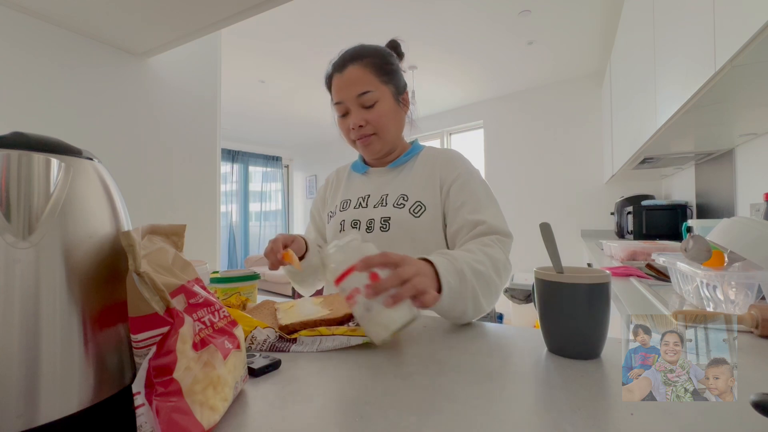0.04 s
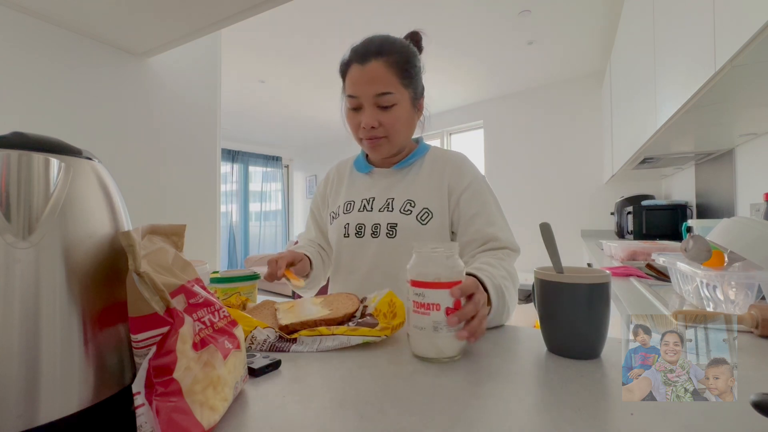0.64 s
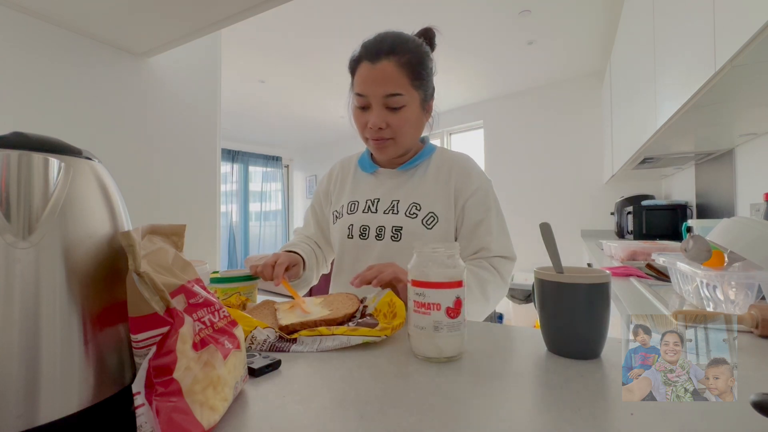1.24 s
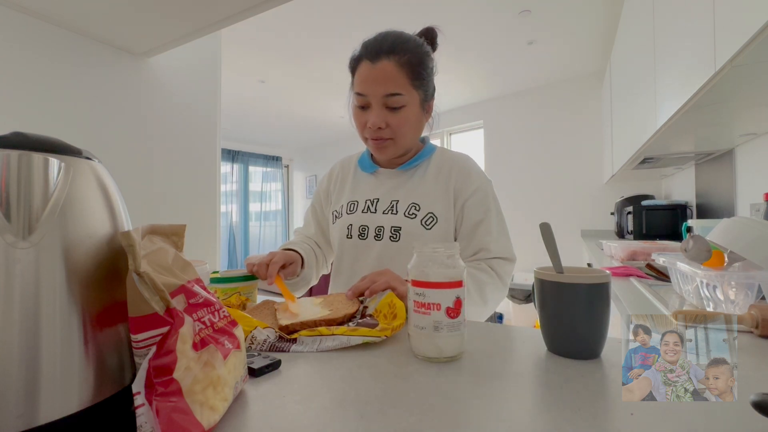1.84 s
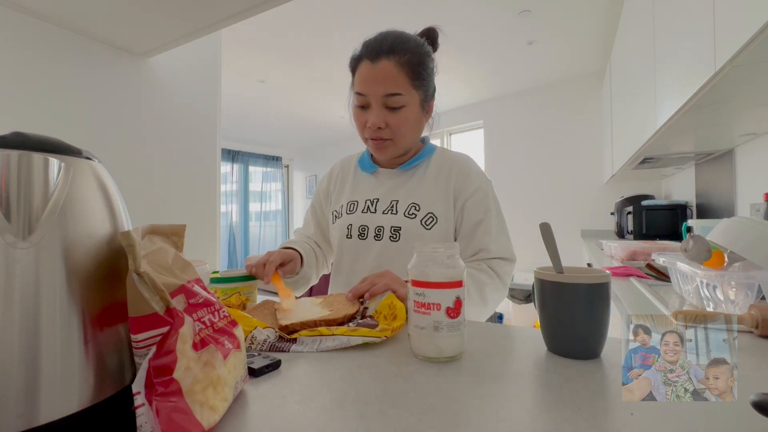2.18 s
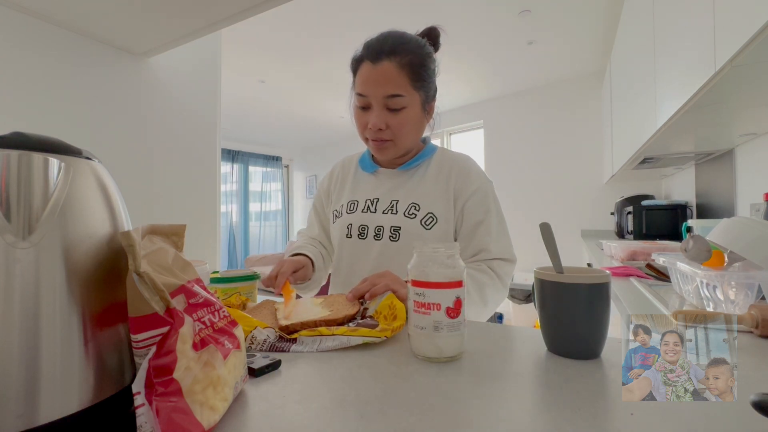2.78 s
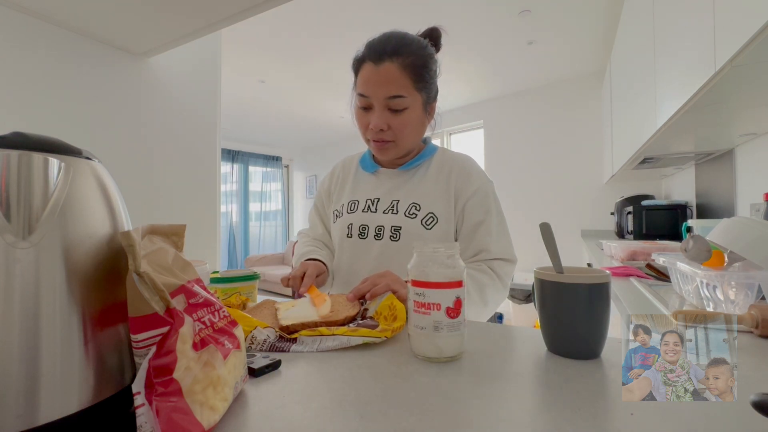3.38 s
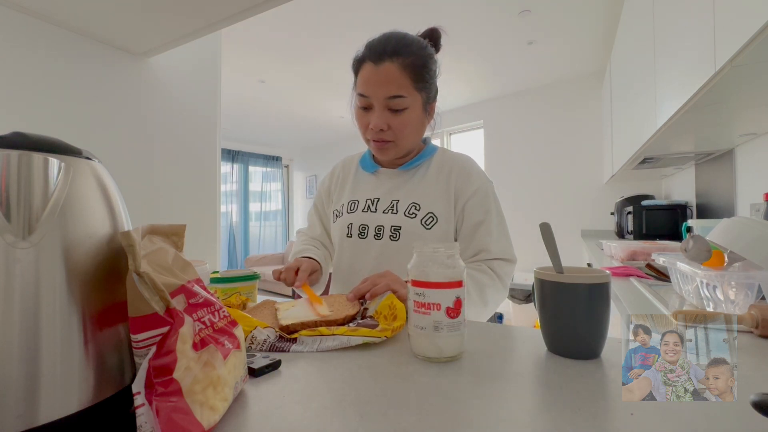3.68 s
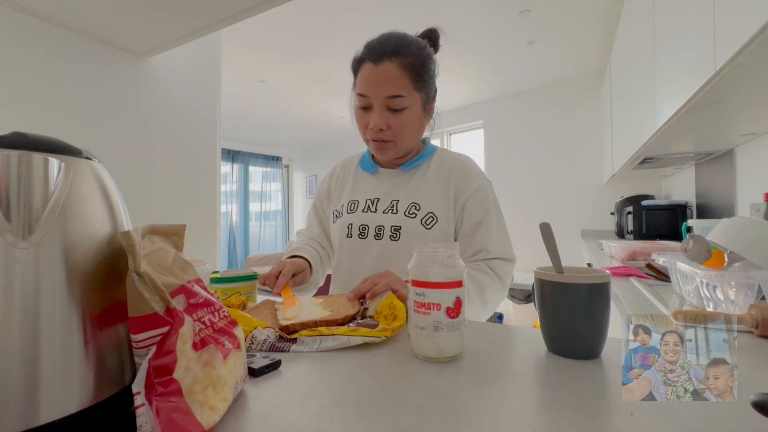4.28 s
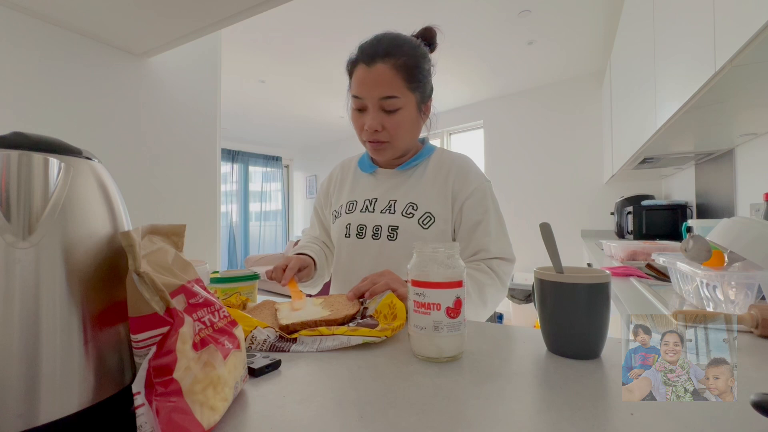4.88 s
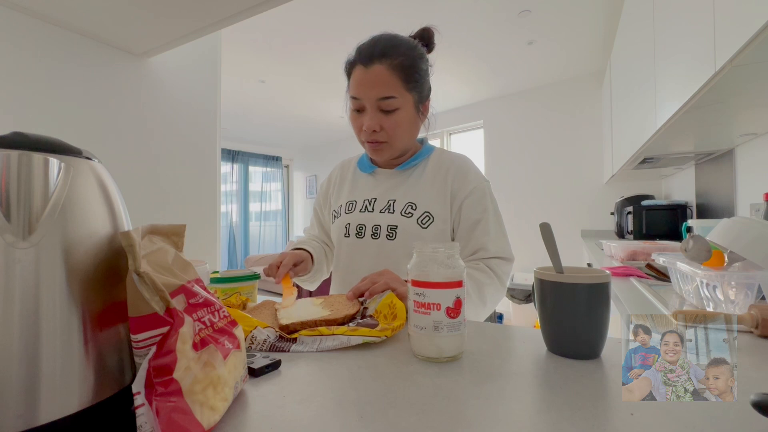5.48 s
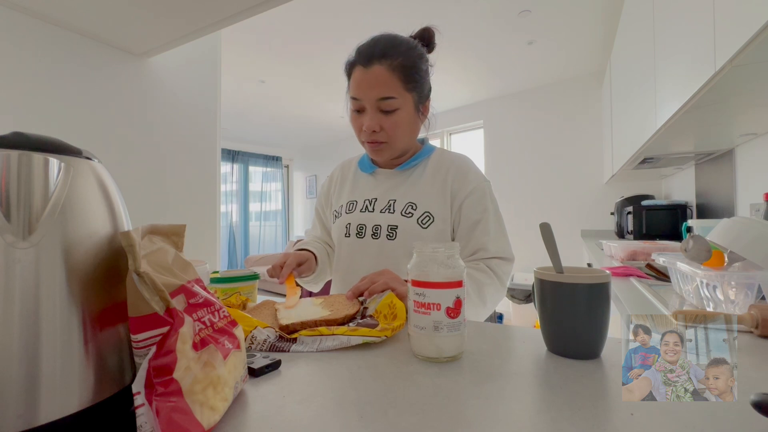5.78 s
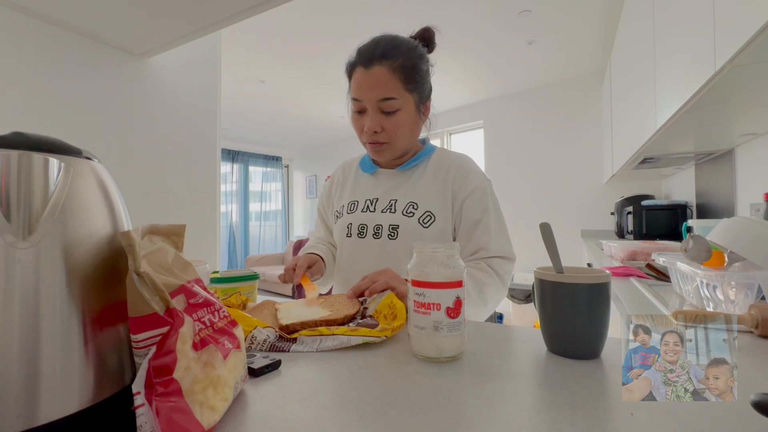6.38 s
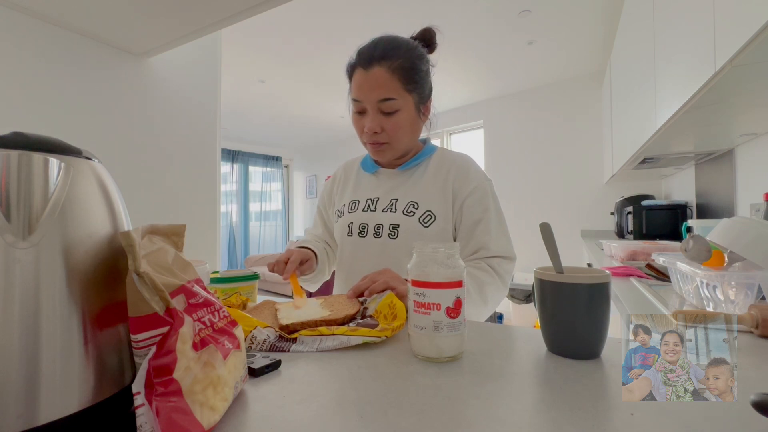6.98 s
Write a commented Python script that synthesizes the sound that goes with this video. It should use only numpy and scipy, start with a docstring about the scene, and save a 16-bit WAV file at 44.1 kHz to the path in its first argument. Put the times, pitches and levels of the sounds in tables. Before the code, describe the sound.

In a quiet kitchen, a glass jar clatters onto the counter beside the stereo microphone with two ringing knocks, the second much harder, and sugar shifts inside. Soft, grainy scrapes follow slightly to the left as a knife butters toast in uneven strokes. A paper wrapper crinkles briefly, and later come gentle bumps, small crust ticks and short blade rasps. A far engine drones faintly under the room's low rumble.

```python
"""A bright kitchen, stereo microphone close to the counter, a plate of toast just to its left.
A glass sugar jar is moved with a brief soft rustle and hiss, lands by the microphone, rocks, and at
0.66 s lands again with a knock that overloads; counter and glass ring, the sugar slides. From 1 s on a
knife spreads butter in stick-slip strokes. A paper wrapper crinkles at 2.07-2.4 s; then come soft bumps,
ticks of crust and short rasps of the blade. Room tone and a faint far engine lie under it all."""
import sys
import numpy as np
from scipy import signal
from scipy.fft import rfft, irfft, next_fast_len
from scipy.io import wavfile
from scipy.ndimage import map_coordinates

SR = 44100
rng = np.random.default_rng(int(sys.argv[2]) if len(sys.argv) > 2 else 0)


def store_pcm(level_fs):
    """Save levels as 16-bit WAV."""
    pcm = np.round(np.clip(level_fs, -1, 1) * 32767).astype(np.int16)
    wavfile.write(sys.argv[1], SR, np.atleast_2d(pcm).T)


N = 319284
TIME = np.arange(N) / SR

# the jar's contacts with the counter: start_s, force_db, low_cut_hz, high_cut_hz, crack_db, ring_db
JAR_KNOCKS = [(0.3475, -0.2, 427, 418.0, -14, -12.5), (0.3493, -1.77, 143.6, 571.0, -21.5, -18.5),
              (0.3532, -6.5, 260, 294.0, -18.0, -13.0), (0.3616, -2, 25, 309.0, -55.0, -41),
              (0.371, -0.5, 21.87, 109.0, -55.0, -39), (0.384, -15.5, 69.0, 307.0, -55.5, -40.0),
              (0.4165, -9, 150, 275.0, -54.5, -29), (0.4242, -2.6, 144.4, 189.0, -55.0, -28.5),
              (0.4361, -6, 47.52, 142.0, -58.5, -39.5), (0.449, -18.5, 61, 612.0, -50.5, -30.5),
              (0.458, -12, 46.0, 461.0, -56, -34.5), (0.655, 13.0, 646, 621.0, -10, -6),
              (0.658, -2, 903, 1285.0, -8.5, -14), (0.665, 1.5, 562, 728.0, -12, -13.0),
              (0.6674, -3.5, 62.0, 268.0, -40.0, -29.5), (0.6789, 3, 282, 768.0, -16.5, -12),
              (0.6903, 8, 182, 180.0, -45.5, -29.5), (0.7019, -8.5, 44.2, 815.0, -50.5, -33)]
# modes of jar, counter and the cabinet below: pitch_hz, level_db, t60_s, left_minus_right_db
COUNTER_MODES = [(79.6, -30.5, 0.4, 0.8), (105.7, -23, 0.28, 5.5), (128.4, -16, 0.065, -0.0),
                 (167, -23, 0.12, 5), (237.5, -20.5, 0.17, 3.5), (257.8, -17.5, 0.31, 3.5),
                 (263, -7.0, 0.107, 6.5), (296.9, -23.5, 0.11, 12.5), (347, -2.5, 0.054, -1),
                 (368.8, -5, 0.052, -2.5), (405.6, -32.5, 0.22, -9.5), (425.7, -24.5, 0.5, -1.5),
                 (433.8, -13.0, 0.135, -2.5), (519.3, -18, 0.174, 4.5), (574.3, -21, 0.093, 16.5),
                 (572.4, -38, 0.603, 3.5), (627, -14.5, 0.035, 16.5), (650, -30, 0.3, -1.5),
                 (684, -13.5, 0.067, -3.5), (770, -25.5, 0.3, 4.5), (807.2, -20.5, 0.058, -14.5),
                 (963.4, -23.5, 0.023, 19.5), (979.8, -18.5, 0.022, -10.9), (1091, -16, 0.102, 14.5),
                 (1228, -13.0, 0.045, 1), (1390, -23, 0.031, 20.5), (1460.7, -20.5, 0.08, 3.5),
                 (1627.2, -10.5, 0.017, 11.5)]
# dense thud of worktop and cabinet: frequency_hz, level_db
THUD_SPECTRUM = [(40, -30.5), (100, -13), (250, 6), (600, 3.5), (900, -10), (1500, -5), (3000, -14.5),
                 (6000, -19.5), (15000, -22)]
# crack of glass on stone: frequency_hz, level_db
CRACK_SPECTRUM = [(500, -16), (1400, -6), (2000, 1), (2700, -4.5), (4000, -11), (6500, -18), (9000, -23),
                  (15000, -33)]
# thud and crack lean to the left: frequency_hz, left_minus_right_db
JAR_BALANCE = [(120, 9.2), (300, 2), (600, 4.6), (1100, 22), (1700, 19.0), (2600, 16), (4000, 9),
               (7000, 23), (9000, 8.3), (12000, 6)]
# ringing wall of the jar: pitch_hz, level_db, t60_s
GLASS_MODES = [(1583, -29.5, 0.041), (1990, -22.5, .036), (2413, -29.5, 0.04), (2590, -24.5, 0.035),
               (2820, -26.5, 0.036), (3106, -33.5, 0.06), (3620, -34, 0.04), (4500, -40.5, .035)]
# two rows of soft rustle and hiss as the jar is moved, then the knife's strokes:
# start_s, press_s, glide_s, drag_db, easing_db, plate_relative_db, hiss_relative_db
RUBS = [(0.0, 0.064, 0.035, -63, -0.5, -18, 0), (0.111, 0.048, 0.11, -80, 0, -7, 16.5),
        (1.042, 0.11, 0.45, -59, 4.5, -4.5, -1.5), (1.899, 0.021, 0.0726, -60, 1, -8, -5.5),
        (2.79, 0.11, 0.28, -57.5, 3, -6.5, -7), (3.25, 0.058, 0.098, -64.5, 2.5, -6, -1.5),
        (3.68, 0.16, 0.1513, -61, 2, -1.5, 4.5), (3.99, 0.041, 0.076, -67.5, -4, -2.5, 0),
        (4.219, 0.041, 0.12, -72, -2, -3, 7), (4.3, 0.11, 0.047, -51.5, 0, -2.5, -3.5),
        (4.43, 0.064, 0.098, -48, 3.5, -4, -5), (4.837, 0.075, 0.0746, -49.5, 5, -1, -5),
        (5.218, 0.0715, 0.17, -46.5, 11, -1, -4.5), (5.771, 0.081, 0.025, -55.5, 1, 0.5, -3.5),
        (6.021, 0.038, 0.026, -53.5, 5.5, -3.5, 5), (6.05, 0.059, 0.19, -57, 0, -5, -1.5),
        (6.518, 0.04, 0.025, -57, 4.5, -4, -0.5), (6.979, 0.096, .12, -61.5, 3, -4, 2)]
# resonances of blade, toast and plate together: pitch_hz, width_hz, level_db
PLATE_RESONANCES = [(384.6, 50, -16), (556.3, 100, -10), (692.8, 58, -4.5), (863, 59, -7.5), (1073, 61, 1),
                    (1154, 50, -4), (1371.5, 280, -8.5), (1578, 110, -5), (1723, 120, -1), (1817, 76, -3),
                    (2280, 49, -12.5), (2560, 160, -20)]
# the blade's higher resonances: pitch_hz, width_hz, level_db
BLADE_RESONANCES = [(3525, 300, -4.5), (3750, 270, -4.5), (4240, 250, -11), (5020, 1400, 1.5),
                    (5970, 610, -9), (6570, 580, -7), (7630, 500, 2.5)]
# dry rasp of the toast: frequency_hz, level_db
TOAST_SPECTRUM = [(150, -0.5), (350, -12), (700, -15.5), (1100, -1.5), (1700, -12), (2500, -6.5),
                  (5000, -24.5)]
# hiss of breaking crumbs: frequency_hz, level_db
CRUMB_SPECTRUM = [(300, -33), (1500, -11), (2800, -7.5), (3700, -7.5), (4400, -7.5), (5400, -5.5),
                  (7500, -4.5), (9200, 0.5), (10500, -4.5), (12500, -12.5), (14200, -7), (15500, -14.5)]
# crinkles of a paper wrapper (2.07-2.4 s), then short rasps of the blade:
# centre_s, level_db, pitch_hz, width_hz, half_length_s
CRINKLES_AND_RASPS = [(2.078, -60.5, 1690, 500, 0.012), (2.213, -59, 3630, 1500, 0.005),
                      (2.234, -63, 2760, 600, 0.011), (2.333, -60, 2710, 1510, 0.0094),
                      (2.917, -59.5, 1450, 350, 0.0091), (3.057, -60.5, 2510, 2470, 0.018),
                      (3.323, -70, 1806, 402, 0.11), (4.495, -57.5, 3680, 449, 0.046),
                      (4.938, -64, 5300, 1200, 0.038), (4.505, -56, 5500, 1300, 0.033),
                      (5.316, -53.5, 1650, 159.2, 0.029), (5.335, -66, 5600, 900, 0.031),
                      (6.195, -54, 2480, 450, 0.0036)]
# small ticks, crinkles of the paper wrapper (2.07-2.4 s), then ticks of crust:
# start_s, level_db, clack_relative_db, crumble_s
CRINKLES_AND_TICKS = [(.015, -49.5, 6.5, 0.003), (1.7605, -46, -13.5, 0.0048), (1.907, -52.5, 4.5, 0.006),
                      (1.931, -67.5, 23, 0.003), (2.081, -48, 0, 0.009), (2.132, -43.5, -6, 0.0051),
                      (2.189, -40, -13, 0.0042), (2.21, -43.5, 2, 0.0055), (2.253, -52.5, 7, 0.0047),
                      (2.3304, -44, 0, 0.016), (2.398, -54.5, 1, 0.005), (3.2348, -37, -10.5, 0.0026),
                      (4.476, -39.5, -3, 0.0075), (4.835, -53, -15, 0.025), (4.925, -36.5, 1.5, 0.0024),
                      (5.205, -54, 7, 0.013), (5.358, -35, -9, 0.0022), (5.363, -33.5, -1, 0.0034),
                      (5.408, -39, -1, 0.0047), (5.447, -40.5, 7.5, 0.0063), (5.4819, -33, -7, 0.0036),
                      (5.78, -47.5, 4, 0.0038), (5.807, -43.5, 8, 0.0026), (5.8505, -32, 0.5, 0.003),
                      (5.8561, -47, 7, 0.002), (5.945, -47, -23, 0.0021), (6.0065, -54, 1, 0.0054),
                      (6.034, -52, 11, 0.01), (6.048, -39.5, 6, 0.0036), (6.058, -31.5, -3, 0.0027),
                      (6.958, -52.5, 5, 0.025)]
# a snap of paper or crust: frequency_hz, level_db
SNAP_SPECTRUM = [(150, -7), (500, 0), (1500, -1), (3000, -4.5), (6000, -4.5), (9000, -2), (12000, -11),
                 (15000, -13.5)]
# sugar sliding in the jar: start_s, level_db, rise_s
SUGAR_SLIDES = [(0.411, -45.5, 0.0086), (0.4438, -45.5, 0.006), (.677, -43.5, 0.0023), (0.831, -61, 0.032)]
# sugar crystals against glass: frequency_hz, level_db
SUGAR_SPECTRUM = [(500, -4.5), (1800, 10.5), (3500, -1.5), (7000, -4), (10000, -2), (12500, -11),
                  (15000, -12.5)]
# soft bumps on the counter: start_s, level_db, pitch_hz, t60_s
SOFT_BUMPS = [(2.752, -55, 518, 0.089), (2.754, -39.5, 263.6, 0.15), (2.757, -55, 349, 0.095),
              (5.311, -49, 361, 0.11), (5.851, -45, 553, 0.13)]
# the microphone's right port lies in shadow: frequency_hz, left_minus_right_db
PORT_SHADOW = [(200, 4), (700, 4), (1200, 13), (2400, 8), (4400, 15), (6500, 16), (8200, 7.5), (9500, 1),
               (15000, 0)]
# kitchen reverberation: frequency_hz, t60_s
KITCHEN_DECAY = [(80, 0.9), (250, 0.61), (500, 0.5), (1000, 0.46), (2000, 0.49), (5000, 0.12),
                 (14000, 0.55)]
# tiles and cupboards give back mostly the midrange: frequency_hz, level_db
KITCHEN_SPECTRUM = [(100, -1.5), (240, -1.5), (420, -0.5), (660, 2.5), (1400, -0.5), (3000, 2.5),
                    (8000, -0.5)]
# likeness of diffuse sound at the two ports: frequency_hz, correlation
PORT_LIKENESS = [(60, 1), (130, 0.2), (300, 0.3), (700, 0), (15000, 0.3)]
# room tone: frequency_hz, level_db
ROOM_SPECTRUM = [(25, -23.5), (50, 2), (80, -2), (108, -4), (135, -1), (162, -4), (195, -16.5), (260, -13),
                 (380, -23), (1700, -30.5), (2400, -25), (3200, -37.5), (5300, -36), (9000, -45),
                 (15000, -50.5)]
# slow swell of the room's rumble: time_s, level_db
RUMBLE_LEVEL = [(1.1, -59.5), (2.2, -62), (2.6, -61), (3.7, -64.5), (4.7, -60.5), (5.1, -58), (6.4, -59.5),
                (7.0, -54.5)]
# an engine far outside: time_s, firing_hz, level_db
ENGINE_COURSE = [(0, 45.9, -63), (1.3, 41, -64.5), (1.999, 42.84, -63), (3.4, 40.4, -68),
                 (4.4, 42.8, -69.5), (5.1, 42.63, -65.5), (5.8, 46.79, -61), (6.2, 49.84, -62),
                 (6.701, 53.12, -66), (7.24, 52.84, -69)]
# the engine's harmonics: multiple, level_db
ENGINE_HARMONICS = [(1, 0), (2, 2), (3, -0.5), (4, -5.5), (6, -9.5)]


def jar(thud_db=24.5, thud_t60=0.046, crack_db=4.0, rattle_db=3.0, bending_lag_s=.000535):
    """At the microphone, each landing rings and thuds the counter; the glass cracks, rattles, rings."""
    push = 0
    for start, db, low_hz, high_hz, *_ in JAR_KNOCKS:
        blow = signal.sosfilt(butter(high_hz), clicks([start], from_db(db)))
        push = push + signal.sosfilt(butter(low_hz, "high"), blow)
    modes = sum((-1) ** k * panned(db, left_db) * ring(push, hz, t60)
                for k, (hz, db, t60, left_db) in enumerate(COUNTER_MODES))
    # bending waves are slow: they reach the right port later
    modes[1] = np.interp(TIME - bending_lag_s, TIME, modes[1])
    # the worktop bends differently under each port
    worktop = rng.standard_normal((2, SR)) * from_db(-60 * TIME[:SR] / thud_t60)
    thud = through(colour(push, THUD_SPECTRUM), unit_energy(worktop))
    starts, *_, crack_levels, ring_levels = np.transpose(JAR_KNOCKS)
    contact = from_db(crack_db) * dying_noise([(1000, 0.01)], build_s=.0002)
    rattle = from_db(rattle_db) * dying_noise([(1000, 0.39)], build_s=.002)
    strikes = colour(clicks(starts, from_db(crack_levels)), CRACK_SPECTRUM)
    crack = lag_left(through(strikes, contact + rattle), seconds=-.0002)
    taps = clicks(starts, from_db(ring_levels))
    glass = sum(panned(db, left_db=6.5) * ring(taps, hz, t60) for hz, db, t60 in GLASS_MODES)
    return modes + ports(from_db(thud_db) * thud + crack, JAR_BALANCE) + glass


def rub_gains(touch_db=-23, press_curve=1.2, lift_db_per_s=228.5):
    """Each rub builds, glides and dies away; gives the gains of drag, plate ring and hiss."""
    gains = 0
    for start, press_s, glide_s, db, easing_db, plate_db, hiss_db in RUBS:
        age = TIME - start
        pressing = touch_db * (1 - np.clip(age / press_s, 0, 1)) ** press_curve
        gliding = easing_db * np.clip((age - press_s) / glide_s, 0, 1)
        lifting = lift_db_per_s * np.maximum(age - press_s - glide_s, 0)
        rub = (age >= 0) * from_db(db + pressing - gliding - lifting)
        gains = np.hypot(gains, rub * from_db([[0], [plate_db], [hiss_db]]))
    return gains


def rustle_and_knife(drag, plate, hiss, toast_db=-5.5, hiss_db=0.5, blade_db=0.5):
    """Grainy friction, close left: the moved jar rustles, later the blade sticks and slips on toast."""
    judder = from_db(drift(90) - 0.04 * drift(25))
    plate_ring = resonate(judder * grains(2600, spread_db=2.0), PLATE_RESONANCES)
    plate_ring = bend(plate_ring, share=.018 * drift(14))  # wanders as the blade travels
    plate_ring = rms_one(nearby(plate_ring))
    rasp = rms_one(nearby(colour(judder * grains(2300, spread_db=2.0), TOAST_SPECTRUM)))
    crumbs = colour(judder * grains(11000, spread_db=2.0), CRUMB_SPECTRUM)
    # the blade rings only under pressure, which raises its pitch; tilting makes it wander
    pressure = drag / drag.max()
    blade = resonate(judder * grains(8000, spread_db=3.5), BLADE_RESONANCES)
    blade = bend(blade, share=.025 * pressure + .015 * drift(7))
    fine = rms_one(nearby(crumbs + from_db(blade_db) * pressure ** .35 * blade))
    return plate * plate_ring + from_db(toast_db) * drag * rasp + from_db(hiss_db) * hiss * fine


def crinkles_and_rasps():
    """The paper wrapper crinkles, later the blade rasps: short swells of grains, each in one band."""
    swells = 0
    for centre, db, hz, width, half_s in CRINKLES_AND_RASPS:
        gain = from_db(db) * np.exp(-((TIME - centre) / half_s) ** 2)
        swells = swells + gain * rms_one(resonate(grains(3000, spread_db=4.5), [(hz, width, 0)]))
    return nearby(swells)


def crinkles_and_ticks(hiss, snap_db=10.5, clack_db=27.5, stray_db=-3):
    """Paper or crust gives way with a snap, a noise burst and a clack; stray cracks follow the hiss."""
    starts, levels, clack_offsets, _ = np.transpose(CRINKLES_AND_TICKS)
    bursts = sum(signal.lfilter([1], [1, -np.exp(-1 / (crumble_s * SR))], clicks([start], from_db(db)))
                 for start, db, _, crumble_s in CRINKLES_AND_TICKS)
    stray = from_db(stray_db) * hiss * grains(28, spread_db=1.0)
    snap = from_db(snap_db) * (clicks(starts, from_db(levels)) + stray)
    crumble = bursts * rng.standard_normal(N)
    blows = clicks(starts, from_db(levels + clack_offsets)) + stray
    clack = from_db(clack_db) * resonate(blows, PLATE_RESONANCES)
    return nearby(colour(snap + crumble, SNAP_SPECTRUM) + clack, early_db=-2.0, early_t60=0.14)


def sugar():
    """After each jolt the grains surge against the glass and settle."""
    flow = 0
    for start, db, rise_s in SUGAR_SLIDES:
        age = np.maximum(TIME - start, 0) / rise_s
        flow = flow + from_db(db) * age * np.exp(1 - age)
    crystals = colour(grains(9000, spread_db=2.5), SUGAR_SPECTRUM)
    return flow * rms_one(nearby(crystals))


def bumps(soft_hz=900):
    """Soft contacts with the counter wake one low mode each."""
    rings = sum(ring(clicks([start], from_db(db)), hz, t60) for start, db, hz, t60 in SOFT_BUMPS)
    return signal.sosfilt(butter(soft_hz), rings)


def room_tone(left_db=3.5, hiss_db=-61.5, split_hz=330):
    """All around the microphone, a low rumble swells slowly beside a steady faint hiss."""
    bins_hz = np.arange(N // 2 + 1) * SR / N
    white = irfft(diffuse(rfft(rng.standard_normal((2, N))), bins_hz), N)
    air = rms_one(colour(white, ROOM_SPECTRUM))
    rumble = signal.sosfiltfilt(butter(split_hz), air)
    rumble_db = np.interp(TIME, *np.transpose(RUMBLE_LEVEL))
    return panned(rumble_db, left_db) * rumble + panned(hiss_db, 2 * left_db) * (air - rumble)


def far_engine(waver_db=4.0, waver_hz=0.4):
    """A low, distant drone comes through the windows; each harmonic swells and fades on its own."""
    times, firing_hz, levels = np.transpose(ENGINE_COURSE)
    phase = 2 * np.pi * np.cumsum(np.interp(TIME, times, firing_hz) + waver_hz * drift(5.5)) / SR
    drone = sum(from_db(db + waver_db * drift(6.2)) * np.sin(multiple * phase)
                for multiple, db in ENGINE_HARMONICS)
    return panned(np.interp(TIME, times, levels), left_db=1.0) * drone


def nearby(x, early_db=5.0, early_t60=0.041, left_lag_s=.000355):
    """Close sound plus echoes off counter, kettle and jars, which shift as the hand moves."""
    here, there = (through(x, dying_noise([(1000, early_t60)], build_s=0.00058)) for _ in range(2))
    place = drift(4)
    echoes = np.cos(place) * here + np.sin(place) * there
    return ports(lag_left(x + from_db(early_db) * echoes, left_lag_s), PORT_SHADOW)


def dying_noise(t60s, build_s):
    """One second of stereo response: octave bands of noise build up, then die at their own rates."""
    t, tail = TIME[:SR], 0
    edges = np.geomspace(40, 17000, 10)
    for low, high in zip(edges, edges[1:]):
        hz = np.sqrt(low * high)
        band = signal.sosfilt(butter([low, high], "band"), diffuse(rng.standard_normal((2, SR)), hz))
        tail = tail + band * from_db(-60 * t / at_hz(t60s, hz))
    return unit_energy(tail * (1 - np.exp(-t / build_s)))


def diffuse(pair, hz):
    """Two unrelated signals become left and right, most alike in the bass."""
    alike = np.clip(at_hz(PORT_LIKENESS, hz), 0, 1)
    return np.sqrt((1 + alike) / 2) * pair[0] + np.sqrt((1 - alike) / 2) * pair[1] * [[1], [-1]]


def ports(pair, balance):
    """Balance the microphone's two ports, frequency by frequency."""
    return np.array([colour(pair[0], balance, .5), colour(pair[1], balance, -.5)])


def panned(db, left_db):
    """Left and right gains, left_db apart."""
    return from_db(db + left_db * np.array([[.5], [-.5]]))


def lag_left(pair, seconds):
    """Sound reaches the left port later; if negative, earlier."""
    return np.array([map_coordinates(pair[0], [(TIME - seconds) * SR], order=3), pair[1]])


def clicks(times, gains):
    """Single impulses at the given times."""
    out = np.zeros(N)
    np.add.at(out, np.round(np.asarray(times) * SR).astype(int), gains)
    return out + 1e-18


def grains(per_s, spread_db):
    """Random clicks of uneven size."""
    sizes = from_db(spread_db * np.minimum(rng.exponential(1, N), 4)) * rng.standard_normal(N)
    return sizes * (rng.random(N) < per_s / SR)


def drift(rate):
    """A smooth random curve through `rate` points a second."""
    return map_coordinates(rng.standard_normal(4096), [TIME * rate], order=2, mode="mirror")


def ring(x, hz, t60):
    """One mode: each click starts a dying sine."""
    radius, angle = from_db(-60 / (t60 * SR)), 2 * np.pi * hz / SR
    return signal.lfilter([0, np.sin(angle)], [1, -2 * radius * np.cos(angle), radius ** 2], x)


def resonate(x, body):
    """Broad resonances in parallel, signs alternating."""
    out = 0
    for k, (hz, width, db) in enumerate(body):
        radius = np.exp(-np.pi * width / SR)
        forward = np.array([1, 0, -1]) * (1 - radius ** 2) / 2
        feedback = [1, -2 * radius * np.cos(2 * np.pi * hz / SR), radius ** 2]
        out = out + (-1) ** k * from_db(db) * signal.lfilter(forward, feedback, x)
    return out


def bend(x, share):
    """Raise the pitch of a steady sound by a moving share."""
    return map_coordinates(x, [np.cumsum(1 + share)], order=3, mode="mirror")


def colour(x, points, power=1):
    """Filter by a smooth spectrum of frequency_hz, level_db points."""
    size = next_fast_len(x.shape[-1] + 4096)
    gain = from_db(power * at_hz(points, np.arange(size // 2 + 1) * SR / size))
    return irfft(rfft(x, size) * gain, size)[..., :x.shape[-1]]


def butter(hz, kind="low"):
    """Sections of a gentle pass filter."""
    return signal.butter(2, hz, kind, fs=SR, output="sos")


def through(x, response):
    """Convolve with a stereo response."""
    return signal.fftconvolve(np.atleast_2d(x), response, axes=1)[:, :N]


def at_hz(points, hz):
    """Read a table on a log-frequency axis."""
    frequencies, values = np.transpose(points)
    return np.interp(np.log(np.maximum(hz, 1)), np.log(frequencies), values)


def unit_energy(pair):
    """Scale to a mean energy of 1 per channel."""
    return pair / np.sqrt(np.sum(pair ** 2) / 2)


def rms_one(x):
    """Scale so that the middle of the stereo image has rms 1."""
    return x / np.sqrt(np.mean(np.atleast_2d(x).mean(0) ** 2) + 1e-20)


def from_db(db):
    """Decibels to gain."""
    return 10 ** (np.asarray(db) / 20)


def scene(jar_wet_db=-14.0, rubbing_wet_db=-31.5, tick_wet_db=-13.5):
    """The close sources, each with its share of kitchen reverberation, over room tone and engine."""
    drag, plate, hiss = rub_gains()
    knocks = jar() + bumps()
    rubbing = rustle_and_knife(drag, plate, hiss) + crinkles_and_rasps()
    crackle = crinkles_and_ticks(hiss) + sugar()
    send = (from_db(jar_wet_db) * knocks + from_db(rubbing_wet_db) * rubbing
            + from_db(tick_wet_db) * crackle)
    kitchen = through(colour(send, KITCHEN_SPECTRUM), dying_noise(KITCHEN_DECAY, build_s=0.006))
    return knocks + rubbing + crackle + kitchen + room_tone() + far_engine()


def record(dry, ceiling=.98, cutoff_hz=15900):
    """The hardest knock overloads with flat tops; a steep filter cuts the highest treble."""
    clipped = np.clip(dry, -ceiling, ceiling)
    return signal.sosfilt(signal.ellip(10, .1, 70, cutoff_hz, fs=SR, output="sos"), clipped)


dry = scene()
out = record(dry)
store_pcm(out)
```